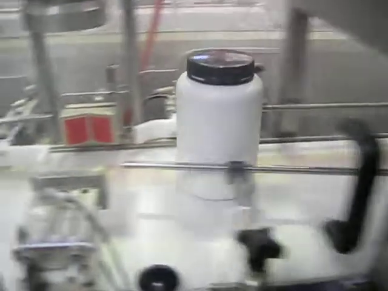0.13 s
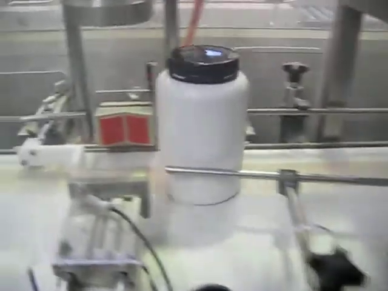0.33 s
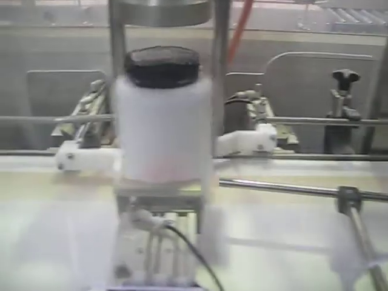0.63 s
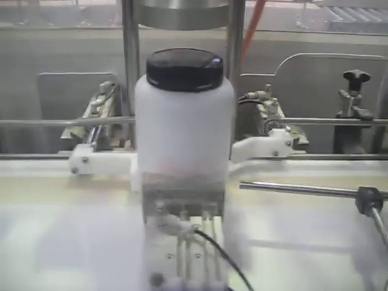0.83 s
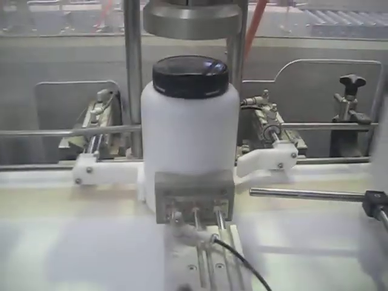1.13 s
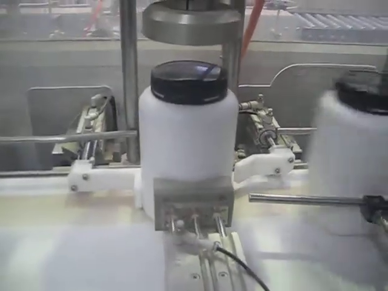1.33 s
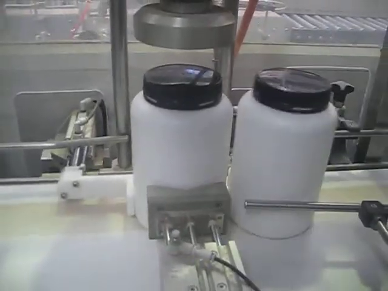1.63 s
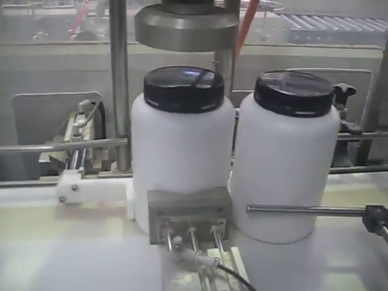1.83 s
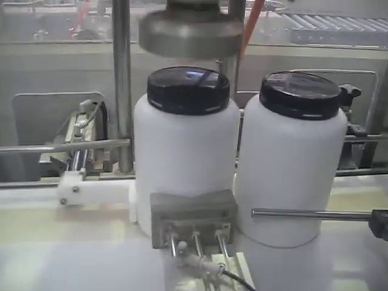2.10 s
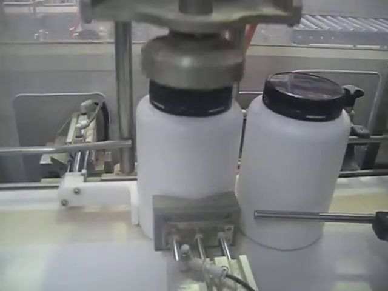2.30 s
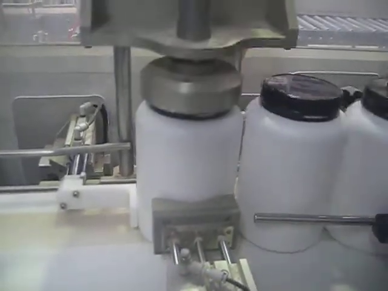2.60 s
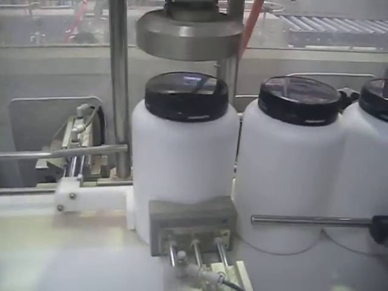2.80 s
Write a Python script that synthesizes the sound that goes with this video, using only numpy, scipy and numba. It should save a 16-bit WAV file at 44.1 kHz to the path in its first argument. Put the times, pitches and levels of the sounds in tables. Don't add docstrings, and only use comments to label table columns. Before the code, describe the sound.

A jar capping machine, close up in a roaring, hissing factory hall. A low belt squeal at 0.3 s, a valve thud with an air spit at 0.5, another at 1.5. The air motor quickly spins up to a steady nasal whine until 2.47, bangs the lid and stalls; the clutch chatters and groans until 2.8 as latch clicks and a scraping rattle lift the head. Background ducks under loud parts.

```python
import sys
import numpy as np
from scipy import signal
from scipy.fft import rfft, irfft, next_fast_len
from scipy.io import wavfile
from scipy.ndimage import uniform_filter1d
from numba import njit

SR = 44100
rng = np.random.default_rng(int(sys.argv[2]) if len(sys.argv) > 2 else 0)


def gain_from_db(level_db):
    decades = np.asarray(level_db, float) / 20
    return 10 ** decades


def digitize_waveform(pressure):
    field = np.atleast_2d(pressure).T
    bounded = np.clip(field, -1, 1)
    quanta = np.round(bounded * 32767).astype(np.int16)
    wavfile.write(sys.argv[1], SR, quanta)


N = 130095

# frequency in Hz, level in dB per Hz.
ROAR_COLOUR = [(18, -40), (30, -18.5), (218, -10.5), (353, -21), (386, -4.5), (638, -7.5), (1260, -0.5),
               (7000, -4.5), (9100, -29), (15400, -120)]
# frequency in Hz, level in dB per Hz.
LEAK_COLOUR = [(5000, -33), (7000, -11.5), (9000, -3.5), (11500, 0.5), (13000, -2), (14500, -10),
               (16500, -16)]
# pitch in Hz, width in Hz, level in dB.
DRIVE_HUMS = [(118.7, 17, -53), (220, 3.7, -46.5), (517, 20, -47), (743.4, 38, -39), (813, 12, -41.5),
              (1237, 81, -45.5), (2557, 11, -41)]
# middle in seconds, length in seconds, pitch in Hz, width in Hz, level in dB.
BELT_SQUEALS = [
    (0.32, 0.054, 787, 50, -29),
    (1.45, 0.031, 2250, 298, -26.5),
]
# time in seconds, level in dB.
LIFT_LEVEL = [
    (2.75, -28),
    (2.79, -12),
    (2.87, -15.5),
    (2.9, -15),
    (2.95, -20),
]
# pitch in Hz, width in Hz, level in dB.
CARRIAGE_BODY = [(149, 93, -9), (245, 142, -2.5), (432, 236, -0.5), (808, 215, -1.5), (1274, 170, -7.5),
                 (1690, 440, -6.5), (3560, 1100, -1)]
# start in seconds, thud level in dB, spit level in dB, spit centre in Hz.
VALVE_SHOTS = [
    (0.5154, -9.5, -12.5, 6560),
    (1.517, -13, -10, 10100),
]
# pitch in Hz, level in dB, time to fall 60 dB in seconds.
VALVE_THUD = [(522, 1, 0.055), (383, -12, 0.016)]
# pitch in Hz, level in dB, 60 dB fall in seconds.
VALVE_HOUSING = [(262, -0.5, 0.038), (119, -15.5, 0.023)]
# pitch in Hz, level in dB, 60 dB fall in seconds.
VALVE_STEM = [(2564, -6.5, 0.073), (12200, -19, 0.073)]
# start in seconds, level in dB, pitch factor.
LID_BLOWS = [(2.4835, -7.5, 0.526), (2.4855, 0, 0.989), (2.544, -12, .9), (2.5455, -2, 0.4),
             (2.5495, -4, 1.12), (2.5505, -10, 0.505), (2.556, -7, .62)]
# pitch in Hz, level in dB, 60 dB fall in seconds.
LID_RING = [(982, 9.5, 0.039), (1650, -2, 0.041), (2830, 4.5, 0.026), (3284, 0.5, 0.027),
            (3670, -12, 0.024)]
# start in seconds, level in dB, pitch factor.
LATCH_TICKS = [(2.7655, -6, 0.64), (2.769, -3.5, 0.976), (2.773, -8, 0.713), (2.7765, -8, 0.77),
               (2.778, -20, 1.), (2.82, -15, 1.), (2.827, -19, 1.1), (2.604, -18, 1.2), (2.895, -16, 0.35)]
# pitch in Hz, level in dB, 60 dB fall in seconds.
LATCH_RING = [(5180, 8, 0.023), (7500, -3, .012), (10600, -2, .01)]
# time in seconds, level in dB, slips per second.
CLUTCH_SLIPS = [(2.49, -55, 200), (2.51, -7.5, 200), (2.54, -7.5, 160), (2.57, -4.5, 130), (2.65, -8, 110),
                (2.68, -6.5, 108), (2.74, -10, 110), (2.77, -6.5, 93), (2.79, -25, 100)]
# pitch in Hz, width in Hz, level in dB.
JAR_BODY = [(307, 30, -5.5), (426.3, 24, -0.5), (579, 35, -1.5), (700, 160, -1), (1110, 140, -8.5),
            (1654, 56, -5.5), (1870, 96, -8), (2238, 150, -6.5), (2840, 220, -11), (3570, 250, -12)]
# time in seconds, level in dB, pitch in Hz.
HEAD_GROAN = [(2.52, -27, 397), (2.535, -18, 450), (2.552, -31, 432), (2.57, -15, 700), (2.61, -26, 560),
              (2.65, -30, 460), (2.69, -21.5, 443), (2.73, -23, 570), (2.76, -33, 460), (2.79, -20, 220)]
# start in seconds, level in dB, pitch in Hz.
CLUTCH_SNAGS = [(2.495, -6.5, 477), (2.515, -6, 370), (2.524, -8, 456), (2.535, -9, 430), (2.556, -13, 616),
                (2.584, -13, 670), (2.603, -9, 480), (2.623, -19, 455), (2.665, -10, 444), (2.671, -7, 540),
                (2.688, -12, 417), (2.699, -10, 555), (2.716, -9, 567), (2.725, -8, 596), (2.738, -6, 580),
                (2.795, -13, 240), (2.84, -14, 198), (2.893, -12.5, 296)]
# multiple of its pitch, level in dB, 60 dB fall in seconds.
SNAG_RING = [(1, 0, 0.053), (1.37, -9, 0.055), (3.8, -8, .035)]
# time in seconds, levels of harmonics 1, 2, 3 and 4 in dB.
WHINE = [(1.6, -52, -37, -40, -53), (1.628, -38, -31, -24, -36), (1.648, -29.5, -24, -31, -34),
         (1.7, -24.5, -29, -25, -29), (1.76, -27, -23.5, -21, -43), (1.8, -28.5, -23.5, -18.5, -34),
         (1.845, -23.5, -20.5, -27, -33), (1.89, -34.5, -21, -29, -48), (1.94, -33, -16, -33, -40),
         (2.01, -30.5, -16.5, -24.5, -34), (2.055, -25.5, -15.5, -30, -38), (2.1, -27.5, -17.5, -26, -37),
         (2.15, -24, -18.5, -21, -34), (2.245, -24, -21, -31, -30), (2.3, -24.5, -20, -36, -37),
         (2.335, -24, -19.5, -22.5, -33), (2.41, -23.5, -28, -21.5, -34), (2.46, -24.5, -31.5, -25.5, -32)]
# multiple of the motor pitch, level in dB, loudest at (seconds), loud again after (seconds).
UPPER_WHINE = [(5, -40, 2.15, 0.17), (6, -40.5, 1.8, 0.81), (7, -47, 1.87, .4), (8, -38.5, 2.08, 0.365),
               (9, -40, 1.97, 0.216), (10, -43.5, 1.95, 0.255), (11, -41.5, 2.33, 0.61),
               (12, -41.5, 2.35, 0.61), (13, -46, 2.3, .5), (16, -42, 1.8, .45), (18, -52, 2.8, .4),
               (20, -54, 2.3, 0.55)]
# time in seconds, share of full speed from 0 to 1,
# level changes of harmonics 1, 2 and 3 in dB (the last also serves all higher ones).
LID_BRAKE = [
    (2.462, 1, -1, -0.5, -2),
    (2.474, 0.98, -3, 12.5, -1),
    (2.481, .9, 1.5, 2, -4),
    (2.488, 0.67, 3, -8, -10),
    (2.505, .55, 6, 11, -4),
    (2.52, .46, -2, -6, -14),
    (2.535, 0.6, -35, -26, -43),
]
# time in seconds, level in dB.
EXHAUST_LEVEL = [(1.55, -60), (1.6, -26), (1.7, -18), (1.8, -22.5), (1.9, -22), (2.2, -21.5), (2.47, -23.5),
                 (2.5, -50)]
# frequency in Hz, level in dB per Hz.
EXHAUST_COLOUR = [(300, -27), (1000, -15), (2500, -2.5), (5000, -4.5), (11000, -12.5), (15500, -12)]
# time in seconds, level in dB.
VENT_LEVEL = [(2.47, -50), (2.5, -22), (2.55, -18), (2.65, -22), (2.75, -24.5), (2.85, -28), (2.95, -20.5)]
# frequency in Hz, level in dB per Hz.
VENT_COLOUR = [(300, -23), (1000, 0), (2500, -2.5), (5000, -6.5), (11000, -8), (13000, -10), (15500, -30)]


@njit
def svf(x, hz, width):
    y, band, low = np.empty(len(x)), 0., 0.
    g, k = np.tan(np.pi * hz / SR), width / hz
    for i in range(len(x)):
        v = (band + g * (x[i] - low)) / (1 + g * (g + k))
        band, low, y[i] = 2 * v - band, low + 2 * g * v, k * v
    return y


@njit
def follow(x, top, up, down):
    y, e = np.empty(len(x)), top
    for i in range(len(x)):
        e += (x[i] - e) * (up if x[i] > e else down)
        y[i] = max(e, top)
    return y


def level(x, db):
    return x * gain_from_db(db) / np.sqrt(np.mean(x ** 2))


def curve(table, axis=1):
    rows = np.array(table)
    return np.interp(np.arange(N) / SR, rows[:, 0], rows[:, axis])


def walk(rate):
    k = int(SR / rate)
    steps = np.repeat(rng.standard_normal(N // k + 1), k)
    return 1.3 * uniform_filter1d(uniform_filter1d(steps, k), k)[:N]


def air(colour, flicker_db, swell_db):
    size = next_fast_len(N)
    f = np.maximum(np.arange(size // 2 + 1) * SR / size, 1)
    hz, db = np.array(colour).T
    tint = gain_from_db(np.interp(np.log(f), np.log(hz), db, left=-80))
    spectrum = rfft(rng.standard_normal(size)) * tint
    out = 0
    for octave in range(5, 15):
        share = np.clip(1 - abs(np.log2(f) - octave), 0, 1)
        out = out + irfft(spectrum * share, size)[:N] * gain_from_db(flicker_db * walk(16))
    return level(out * gain_from_db(swell_db * walk(20)), 0)


def band_noise(hz, width, db):
    return level(svf(rng.standard_normal(N), float(hz), float(width)), db)


def body(x, peaks):
    out = 0
    for k, (hz, width, db) in enumerate(peaks):
        out = out + (-1) ** k * gain_from_db(db) * svf(x, float(hz), float(width)) / np.sqrt(width)
    return level(out, 0)


def strike(events, modes, crack_db=-60, crack_hz=3000.):
    out, t = np.zeros(N), np.arange(6000) / SR
    for at, db, pitch in events:
        ring = sum(gain_from_db(g) * np.sin(2 * np.pi * hz * pitch * t) * 1000 ** (-t / d) for hz, g, d in modes)
        noise = svf(rng.standard_normal(len(t)), crack_hz, 3.0 * crack_hz)
        crack = level(svf(noise, crack_hz, 3.7 * crack_hz), crack_db) * np.exp(-t / 0.0053)
        hit = gain_from_db(db) * (ring + crack) * (1 - np.exp(-t / 0.001))
        i = int(at * SR)
        out[i:i + len(t)] += hit[:N - i]
    return out


def echo(x, t60, db):
    t = np.arange(SR // 2) / SR
    tail = rng.standard_normal(len(t)) * 1000 ** (-t / t60) * (t > .006)
    return gain_from_db(db) * signal.fftconvolve(x, tail / np.sqrt(np.sum(tail ** 2)))[:N]


def hall():
    t = np.arange(N) / SR
    hums = sum(band_noise(hz, width, db) for hz, width, db in DRIVE_HUMS)
    squeals = 0
    for s, length, hz, width, db in BELT_SQUEALS:
        squeals = squeals + band_noise(hz, width, db) * np.exp(-((t - s) / length) ** 2)
    roar = gain_from_db(-23.5) * air(ROAR_COLOUR, flicker_db=0.0, swell_db=-0.57)
    leak = gain_from_db(-24) * air(LEAK_COLOUR, flicker_db=0.6, swell_db=0.13)
    unsteady = gain_from_db(0.6 * walk(29.64) + 0.18 * walk(13.9))
    return (roar + leak) * unsteady + hums + squeals


def valves():
    t = np.arange(N) / SR
    housing_lag_s, spit_lag_s = 0.00036, 0.00402
    spit_rise_s, spit_fall_s = 0.004, 0.0058

    def hit(lag, modes):
        return strike([(s + lag, db, 1.) for s, db, _, _ in VALVE_SHOTS], modes)

    out = hit(0, VALVE_THUD) - hit(housing_lag_s, VALVE_HOUSING) + hit(spit_lag_s, VALVE_STEM)
    for s, _, db, hz in VALVE_SHOTS:
        since = np.maximum(t - s - spit_lag_s, 0)
        noise = rng.standard_normal(N)
        hiss = level(svf(noise, float(hz), 3000.0), 0) + 1.5 * noise
        puff = (1 - np.exp(-since / spit_rise_s)) * np.exp(-since / spit_fall_s)
        out += 1.67 * gain_from_db(db) * puff * hiss
    return out


def lid_blows():
    return strike(LID_BLOWS, LID_RING, crack_db=-1.5, crack_hz=1500.)


def latch_ticks():
    return strike(LATCH_TICKS, LATCH_RING, crack_db=-2.5, crack_hz=4800.0)


def lift():
    rattle = (rng.random(N) < 250 / SR) * gain_from_db(4.6 * rng.standard_normal(N))
    return gain_from_db(curve(LIFT_LEVEL)) * body(level(rattle, -7.0) + rng.standard_normal(N), CARRIAGE_BODY)


def clutch():
    t = np.arange(N) / SR
    turn = np.cumsum(curve(CLUTCH_SLIPS, axis=2) * gain_from_db(3.6 * walk(70))) / SR
    jolts = np.diff(np.floor(turn), prepend=0) * gain_from_db(1.6 * rng.standard_normal(N))
    push = level(jolts, 0) + 0.81 * rng.standard_normal(N)
    chatter = gain_from_db(curve(CLUTCH_SLIPS)) * body(push, JAR_BODY)
    carrier = np.exp(2j * np.pi * np.cumsum(curve(HEAD_GROAN, axis=2)) / SR)
    ringing = signal.lfilter([1], [1, -np.exp(-1 / (0.015 * SR))], push * carrier.conj())
    groan = level((ringing * carrier).real, 10.5)
    edge_s = np.minimum(t - HEAD_GROAN[0][0], HEAD_GROAN[-1][0] - t)
    on = np.clip(edge_s / 0.0064 + 1, 0, 1)
    snags = gain_from_db(3) * strike(CLUTCH_SNAGS, SNAG_RING)
    return chatter + on * gain_from_db(curve(HEAD_GROAN)) * groan + snags


def motor():
    start_s, spin_up_s, free_hz, creep_hz_per_s = 1.54, 0.073, 753, 5
    run = np.maximum(np.arange(N) / SR - start_s, 0)
    hz = (free_hz + creep_hz_per_s * run) * (1 - np.exp(-run / spin_up_s)) * curve(LID_BRAKE)
    wobble = (0.00096 + 0.0296 * np.exp(-run / .08)) * walk(60)
    phase = 2 * np.pi * np.cumsum(hz * (1 + wobble)) / SR
    low = 0
    for k in (1, 2, 3, 4):
        unsteady_db = (0.8 + 3.3 * np.exp(-run / 0.18)) * walk(70)
        db = curve(WHINE, axis=k) + curve(LID_BRAKE, axis=min(k + 1, 4)) + unsteady_db
        low = low + gain_from_db(db) * np.sin(k * phase + k)
    high = 0
    for k, db, at, again in UPPER_WHINE:
        standing_db = 4.5 * np.cos(2 * np.pi * (run + start_s - at) / again)
        wander_db = 2.5 * walk(25.1) + 1.6 * walk(59.66)
        high = high + gain_from_db(db + standing_db + wander_db) * np.sin(k * phase + k * k)
    nearer_db = 1.5 * run
    high = high * gain_from_db(-2 + nearer_db + curve(LID_BRAKE, axis=4)) * (hz / free_hz) ** 4
    whine = np.clip(run / 0.043, 0, 1) * gain_from_db(13.5) * (low + high)
    exhaust = air(EXHAUST_COLOUR, flicker_db=2.0, swell_db=2.3) * (1 + 0.43 * np.sin(phase))
    far = echo(whine * (0.24 + np.exp(-(run / 0.27) ** 2)), t60=0.5, db=-3)
    vent = air(VENT_COLOUR, flicker_db=2.5, swell_db=3.0)
    return whine + far + gain_from_db(curve(EXHAUST_LEVEL)) * exhaust + gain_from_db(curve(VENT_LEVEL)) * vent


def scene():
    hits = valves() + lid_blows() + latch_ticks()
    hits = signal.sosfilt(signal.butter(2, 70, "high", fs=SR, output="sos"), hits)
    tail = echo(hits, t60=0.17, db=-14.5)
    mono = hits + tail + motor() + clutch() + lift() + hall()
    return np.array([mono, mono])


def top_cut(x):
    return signal.sosfilt(signal.butter(12, 16640, fs=SR, output="sos"), x)


def record(dry):
    notch_hz = 7880.
    x = signal.sosfilt(signal.butter(2, 22, "high", fs=SR, output="sos"), dry[0])
    x = x - 0.66 * svf(x, notch_hz, 1100.)
    attack_s, release_s, ratio = 0.0048, 0.089, 3.82
    loudness = follow(np.abs(x), float(gain_from_db(-15.5)), 1 / (attack_s * SR), 1 / (release_s * SR))
    x = x * (gain_from_db(-19) / loudness) ** (1 - 1 / ratio)
    ceiling = gain_from_db(-1.7)
    x = ceiling * np.tanh(x / ceiling)
    x = x - 0.96 * svf(x, notch_hz, 330.)
    x = signal.sosfilt(signal.ellip(12, .3, 80, 15730, fs=SR, output="sos"), x)
    return top_cut(np.array([x, x]))


dry = scene()
out = record(dry)
digitize_waveform(out)
```